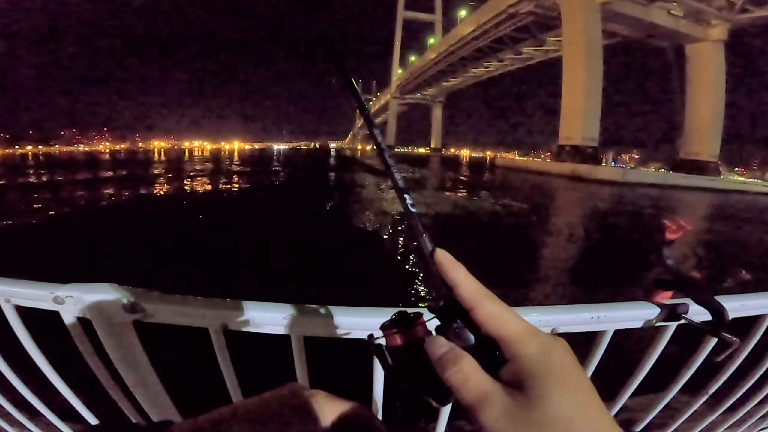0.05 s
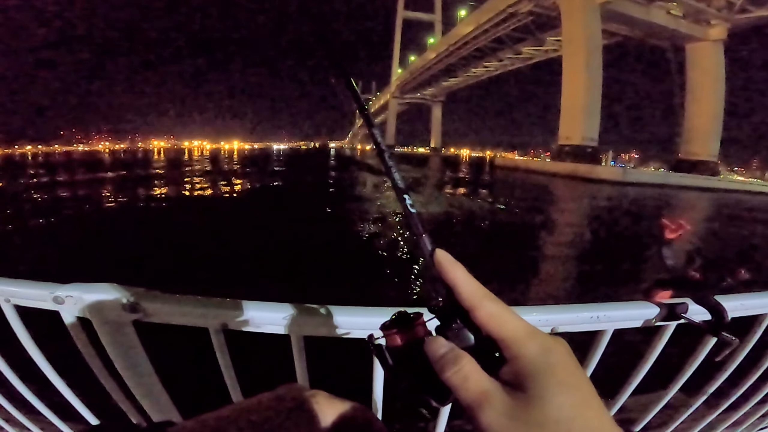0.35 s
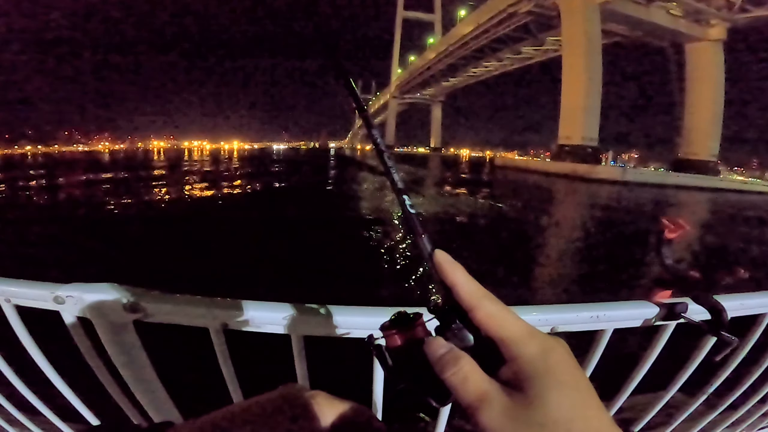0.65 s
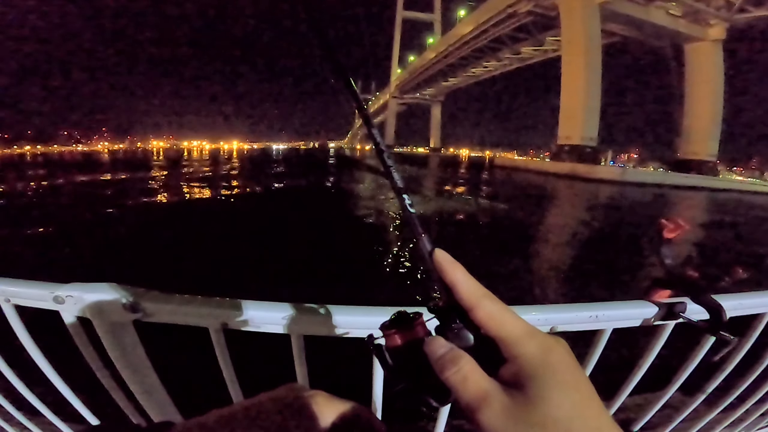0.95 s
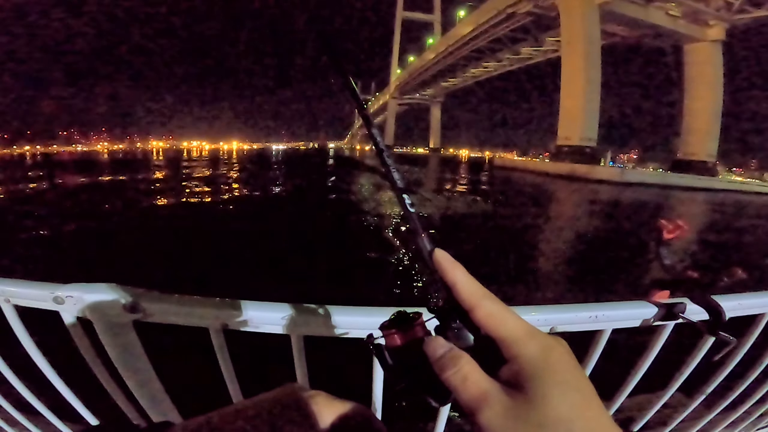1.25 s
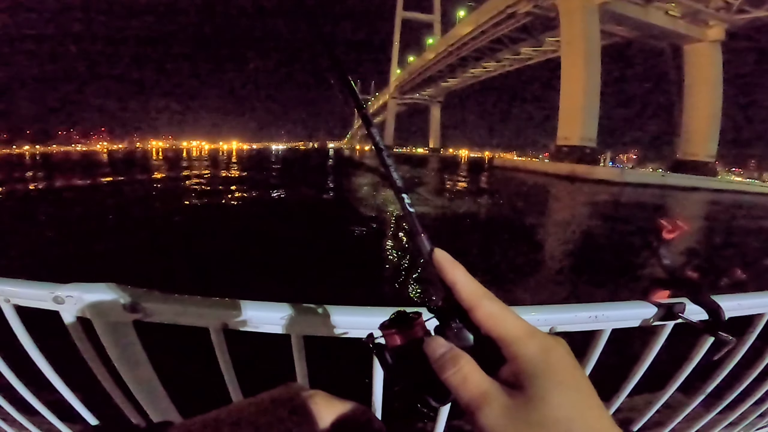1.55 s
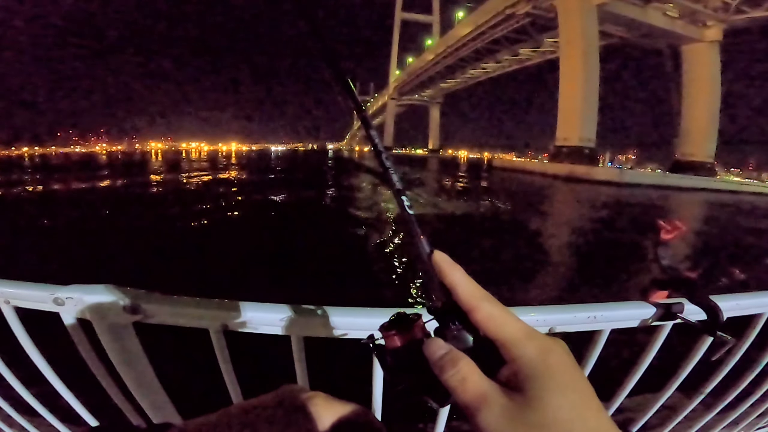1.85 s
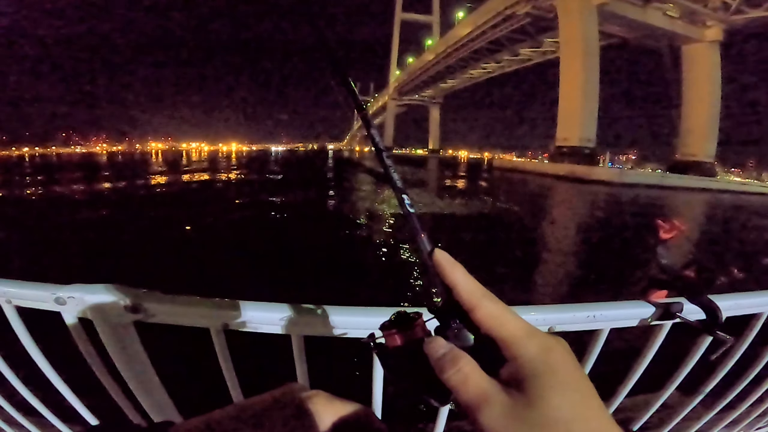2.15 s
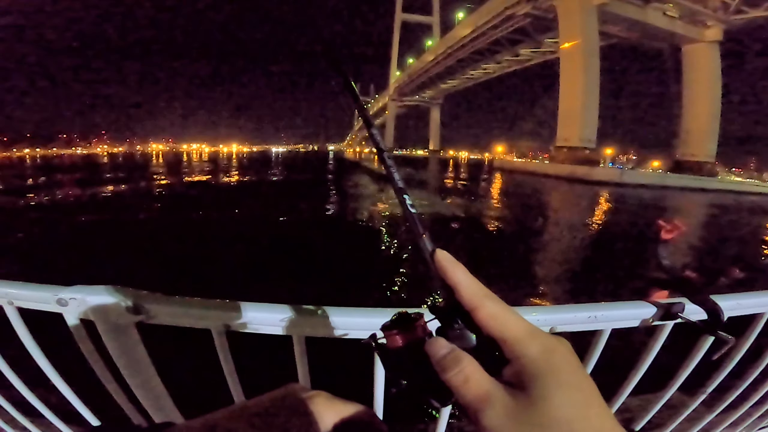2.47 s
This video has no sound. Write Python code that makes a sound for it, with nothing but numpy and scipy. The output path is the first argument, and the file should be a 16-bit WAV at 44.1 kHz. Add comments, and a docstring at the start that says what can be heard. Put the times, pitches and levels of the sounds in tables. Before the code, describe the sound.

Steady low traffic rumble from a bridge overhead, then a fishing reel's ratchet clicks and buzzes in quick tugs near the end.

```python
"""Under a big road bridge at night, fishing from a railing. Overhead the deck rumbles, tyres roar and
girders boom; near 3 s a lorry's axles slam over a joint. A diesel hums on the waterfront and a breeze
flutters on the microphone. From about 7 s line runs off the reel in tugs, close on the right:
ratchet teeth strike the pawl and ring it, its spring and the reel's frame."""
import sys
import numpy as np
from scipy import signal
from scipy.fft import rfft, irfft
from scipy.io import wavfile

SR = 44100
rng = np.random.default_rng(int(sys.argv[2]) if len(sys.argv) > 2 else 0)


def inscribe(sig):
    """Save sig as 16-bit PCM at rate SR to the path in sys.argv[1].

    A 1-D sig is mono; a 2-D sig holds one channel per row.
    Samples are clipped to [-1, 1] before scaling.
    """
    pcm = np.round(np.clip(np.atleast_2d(sig).T, -1, 1) * 32767)
    wavfile.write(sys.argv[1], SR, pcm.astype(np.int16))


N = 362943
T = np.arange(N) / SR
HZ = np.fft.rfftfreq(N, 1 / SR)
SPOOL_START_S, CREEP_TEETH_PER_S = 6.95, 52.11

# Noise spectra. Each row: frequency in Hz, relative density in dB.
DECK_SPECTRUM_DB = [(40, -17.5), (80, 7), (125, 0.5), (170, -2.5), (260, -3), (340, -7), (450, -4.5),
                    (520, -8), (620, -20.5), (1200, -80), (5000, -110)]
ROAR_SPECTRUM_DB = [(250, -7.5), (450, -10.5), (600, 1), (780, -0.5), (930, 2.5), (1200, -1), (1500, -5.5),
                    (2000, -11.5), (3000, -19.5), (6000, -72), (15000, -91.5)]
HISS_SPECTRUM_DB = [(900, -30), (1600, 1), (2300, 2), (3300, -4.5), (3900, -3), (5000, -12), (6500, -17),
                    (8300, -24), (10000, -30.5), (12500, -42), (15000, -55)]
GIRDER_SPECTRUM_DB = [(6, -22.5), (16, 2.5), (28, -2.5), (44, 3.5), (60, -7.5), (85, -9.5), (130, -28),
                      (400, -62.5), (2000, -110)]
FLUTTER_SPECTRUM_DB = [(6, -13.5), (20, 13.5), (45, 2), (75, 0.5), (120, -15), (200, -14), (400, -37.5),
                       (2000, -100)]
PUFF_SPECTRUM_DB = [(10, -16), (40, -6), (70, -7), (140, 0), (200, -19.5), (400, -27), (2000, -85)]
ROLL_SPECTRUM_DB = [(50, -20), (100, -9.5), (140, 4), (190, 1), (245, -1), (320, -1.5), (380, -2),
                    (600, -10.5), (1050, -13), (1600, -20.5), (3000, -60), (10000, -99.5)]
SLAM_SPECTRUM_DB = [(40, -29), (100, -0.5), (150, 6), (205, -4.5), (394, -5.5), (547, -15), (893, -14),
                    (1400, -21.5), (2860, -38.5), (6000, -91)]
TAP_SPECTRUM_DB = [(1000, -22), (4000, 5), (9500, -2), (12300, -6), (13500, -20), (16000, -32)]
RUB_SPECTRUM_DB = [(1000, -23.5), (3000, 5), (3900, 16.5), (5000, 5.5), (6600, 7), (9500, -4.5),
                   (12300, -8.5), (13500, -12.5), (16000, -28.5)]
LINE_SPECTRUM_DB = [(700, -8), (1400, -0.5), (2300, -1), (4000, -5.5), (7000, -16.5), (14000, -32.5)]
TICK_SPECTRUM_DB = [(600, 0), (1500, -5), (2500, 2), (4200, 5), (6300, 13.5), (7200, 5), (9500, 6),
                    (10600, 0), (11800, 3), (14000, 1), (15500, -4)]

# Level curves. Each row: time in seconds, level in dB.
HISS_LEVEL_DB = [(0, -53.5), (.55, -61.5), (1.0, -58.5), (1.8, -56), (2.05, -60), (2.5, -57.5), (4.15, -60),
                 (4.95, -56.5), (5.3, -59), (5.6, -55.5), (6.0, -58.5), (6.5, -56.5)]
GIRDER_LEVEL_DB = [(0, -37.5), (.7, -30.5), (1.1, -42.5), (1.5, -24), (1.8, -30.5), (2.2, -28),
                   (2.9, -33.5), (3.75, -29.5), (4.2, -34.5), (6.9, -36.5), (8.23, -40)]
DIESEL_LEVEL_DB = [(0, -23), (.65, -26.5), (1.25, -33), (1.62, -26.5), (1.83, -29), (2.0, -26.5),
                   (2.35, -24.5), (2.82, -24), (3.03, -31), (3.25, -23.5), (3.6, -28.5), (3.76, -24.5),
                   (4.55, -26), (4.7, -28.5), (5.75, -30), (5.92, -24.5), (6.65, -24.5), (7.15, -24.5),
                   (7.75, -28), (8.23, -27.5)]
WHINE_LEVEL_DB = [(0, -50.5), (3, -53.5), (4.5, -43.5), (6.5, -41), (8.23, -44)]
FLUTTER_LEVEL_DB = [(0, -37), (.7, -53.5), (3.1, -43), (4.2, -67), (5.05, -39), (5.9, -55), (6.75, -38),
                    (8.23, -40)]
LINE_LEVEL_DB = [(6.76, -100), (6.83, -47.5), (6.9, -44), (6.97, -35), (7.04, -48), (7.2, -52), (8.23, -44)]
SPRING_LEVEL_DB = [(6.955, -48), (7.02, -48), (7.075, -54), (7.103, -40), (7.125, -51), (7.483, -53),
                   (7.55, -55), (7.604, -44.5), (7.66, -57), (7.72, -51), (7.803, -52), (7.916, -42),
                   (7.96, -49), (8.0, -53), (8.094, -57), (8.171, -41), (8.196, -47), (8.221, -44)]
TICK_LEVEL_DB = [(6.95, -55), (7.02, -49), (7.08, -55), (7.25, -56), (7.37, -56), (7.53, -56.5),
                 (7.62, -48), (7.67, -52.5), (7.87, -51), (7.97, -51.5), (8.07, -55), (8.23, -49.5)]

# Single events. Each row: peak time in seconds, level in dB.
WIND_PUFFS = [(1.43, -35), (7.14, -34), (7.52, -25), (7.8, -40)]
AXLE_HITS = [(3.04, -29), (3.15, -32.5), (3.21, -24), (3.29, -28), (3.47, -37), (3.6, -31.5), (3.77, -32.5)]
TACKLE_TAPS = [(1.1124, -52), (1.3389, -60), (1.5294, -66), (1.6412, -58)]

# Engine and motor partials. Each row: multiple of the shaft rate, relative level in dB.
DIESEL_ORDERS = [(2, -0.5), (3, -20.5), (4, -22.5), (6, -29.5), (7, -27)]
WHINE_ORDERS = [(1, -2), (2, -16), (4, -19.5)]

# Reel resonances. Each row: frequency in Hz, bandwidth in Hz, relative gain in dB.
SPRING_MODES = [(8660, 73, 5), (7260, 50, -14), (7470, 54, -17), (7900, 72, -5), (9700, 53, -6)]
FRAME_MODES = [(2720, 180, 4.5), (3300, 70, -2), (3670, 76, 2.5), (4900, 410, 0), (7360, 60, 7),
               (9700, 100, 2.5)]

# Diffuse sound. Each row: frequency in Hz, left-right coherence as a ratio.
COHERENCE = [(30, 0.98), (130, 0.99), (290, 1), (640, 0.94), (1400, 0.81), (3100, 0.56), (7000, 0.78),
             (15000, 0.38)]
# Traffic flow. Each row: time in seconds, deck rumble in dB, tyre roar in dB.
TRAFFIC_LEVELS_DB = [(0, -35, -44.5), (.6, -38, -45), (1.4, -35.5, -43.5), (2.8, -36.5, -41.5),
                     (3.6, -34, -39.5), (4.5, -35, -40), (5.1, -33, -38.3), (5.28, -35, -39.5),
                     (5.65, -33.5, -38.5), (6.4, -35.5, -39), (7.5, -34.5, -39.5), (8.23, -32.5, -38)]
# Hand shifts on the rod. Each row: centre in seconds, half length in seconds, level in dB.
HAND_RUBS = [(.08, .14, -67.5), (.98, 0.046, -75), (1.14, .05, -69), (1.5, .17, -75), (1.76, .11, -68),
             (2.35, .06, -73), (4.4, 0.13, -71), (4.92, 0.31, -68), (5.57, .06, -69)]
# Spool speed, creeping between tugs. Each row: time in seconds, rate in teeth per second.
SPOOL_TEETH_PER_S = [(6.95, 66), (6.99, 180), (7.0, 179), (7.04, 105), (7.1, 148), (7.14, 62), (7.21, 110),
                     (7.24, 28), (7.29, 66), (7.33, 48), (7.41, 57), (7.55, 70), (7.6, 128), (7.63, 114),
                     (7.72, 170), (7.75, 124), (7.81, 87), (7.85, 95), (7.88, 146), (7.94, 143), (7.98, 80),
                     (8.11, 79), (8.15, 173), (8.23, 152)]
# Pawl squeak, shifting with load. Each row: time in seconds, level in dB, pitch in Hz.
PAWL_SQUEAK = [(6.955, -44, 6600), (6.985, -33, 5880), (7.0, -29, 5850), (7.02, -32.5, 5800),
               (7.04, -47, 6100), (7.062, -46, 5900), (7.09, -35.5, 5200), (7.119, -51.5, 5550),
               (7.193, -45, 5850), (7.303, -57, 5370), (7.42, -54, 5270), (7.485, -46, 5600),
               (7.528, -47, 6180), (7.556, -45, 6100), (7.596, -32, 5900), (7.655, -48, 6100),
               (7.668, -46.5, 5620), (7.684, -44, 5900), (7.697, -45, 5430), (7.734, -42, 6050),
               (7.748, -46, 5680), (7.764, -40, 6000), (7.792, -37, 5600), (7.815, -48, 5620),
               (7.857, -50, 6000), (7.876, -39.5, 4960), (7.943, -48, 5900), (7.991, -39.5, 5750),
               (8.055, -54, 6080), (8.127, -41, 5700), (8.153, -49, 5540), (8.177, -44, 6100),
               (8.192, -36, 5800), (8.221, -37, 5930)]
# Hard pawl catches. Each row: start in seconds, level in dB, pitch in Hz.
PAWL_CATCHES = [(7.2125, -14.5, 5540), (7.2245, -21, 5630), (7.2469, -28, 5400), (7.399, -25, 4950),
                (7.621, -20, 5710), (7.774, -24, 5700), (7.981, -21, 5530), (8.017, -20, 5850)]
# Spring releases. Each row: start in seconds, ring level in dB, tick level in dB, pitch in Hz.
SPRING_PINGS = [(7.2272, -35, -48, 8740), (7.2479, -37, -46, 8830), (7.2712, -29, -46, 8600),
                (7.2898, -34, -44, 8660), (7.3033, -33, -47, 8500), (7.3213, -28, -42, 8700),
                (7.4165, -31, -45, 8710), (7.8161, -32, -32, 8600), (8.0306, -35, -38, 8500)]
# Fits of frame ringing. Each row: centre in seconds, level in dB, pitch in Hz.
FRAME_RATTLES = [(6.965, -45, 2800), (6.985, -46, 3710), (7.113, -45, 2830), (7.198, -46, 3690),
                 (7.44, -44, 2740), (7.6, -46, 3800), (7.695, -42, 3730), (7.7, -41, 2820),
                 (7.9, -44, 2660), (7.925, -43, 2820), (7.975, -45, 2730), (7.985, -48, 3710),
                 (8.145, -39, 2750)]


def gain_of(db):
    """Decibels to amplitude."""
    return 10 ** (np.asarray(db) / 20)


def unit_rms(x):
    """Scale to rms 1."""
    return x / np.sqrt(np.mean(x ** 2) + 1e-20)


def unit_in_band(pair, band_hz):
    """Scale a pair so its mid signal has rms 1 within the band."""
    inside = (HZ > band_hz[0]) & (HZ < band_hz[1])
    return pair / np.std(irfft(rfft(pair.mean(0)) * inside, N))


def at_hz(table, hz):
    """Interpolate a table over log frequency."""
    row_hz, values = np.transpose(table)
    return np.interp(np.log(hz + 1), np.log(row_hz + 1), values)


def curves(table):
    """Each value column of a time table, per sample."""
    row_s, *columns = np.transpose(table)
    return [np.interp(T, row_s, column) for column in columns]


def wander(rate_hz):
    """Random drift of rms 1, rolled off above rate_hz."""
    return unit_rms(irfft(rfft(rng.standard_normal(N)) / (1 + (HZ / rate_hz) ** 4), N))


def swell(centre_s, half_s):
    """Gaussian bump of height 1."""
    return np.exp(-((T - centre_s) / half_s) ** 2)


def from_right(pair, lag_us, louder_db=0):
    """Source on the right: left channel lags, right is louder by louder_db."""
    left = irfft(rfft(pair[0]) * np.exp(-2j * np.pi * HZ * lag_us / 10 ** 6), N)
    return np.array([left * gain_of(-louder_db / 2), pair[1] * gain_of(louder_db / 2)])


def diffuse_noise(spectrum_db):
    """Coloured noise from the right, less coherent in the treble."""
    shared, separate = rfft(rng.standard_normal((2, N)))
    coherence = np.clip(at_hz(COHERENCE, HZ), -1, 1)
    right = coherence * shared + np.sqrt(1 - coherence ** 2) * separate
    pair = irfft(np.array([shared, right]) * gain_of(at_hz(spectrum_db, HZ)), N)
    return from_right(pair, lag_us=37.6)


def colour(pair, spectrum_db, size=2048):
    """Minimum-phase filter; clicks keep sharp fronts."""
    log_gain = np.log(gain_of(at_hz(spectrum_db, abs(np.fft.fftfreq(size, 1 / SR)))))
    taps = np.fft.ifft(np.exp(np.conj(signal.hilbert(log_gain)))).real
    return signal.oaconvolve(pair, taps[None], axes=1)[:, :N]


def resonate(x, hz, width_hz):
    """One resonance tracking the curve hz."""
    carrier = np.exp(2j * np.pi * np.cumsum(hz) / SR)
    pole = np.exp(-np.pi * width_hz / SR)
    return 2 * (carrier * signal.lfilter([1 - pole], [1, -pole], x / carrier + 1e-18)).real


def ring(x, modes, bend):
    """Damped modes, detuned together by the ratio bend."""
    return sum(gain_of(db) * resonate(x, hz * bend, width_hz) for hz, width_hz, db in modes)


def traffic():
    """Wheels shake the deck and tyres roar on the road; water laps below with a soft, wavering hiss."""
    deck_db, roar_db = curves(TRAFFIC_LEVELS_DB)
    hiss_db, = curves(HISS_LEVEL_DB)
    deck = unit_in_band(diffuse_noise(DECK_SPECTRUM_DB), (110, 550)) * gain_of(deck_db + 1.25 * wander(4))
    roar = unit_in_band(diffuse_noise(ROAR_SPECTRUM_DB), (600, 1800))
    roar *= gain_of(roar_db + .65 * wander(24))
    hiss = unit_in_band(diffuse_noise(HISS_SPECTRUM_DB), (3500, 9000))
    hiss *= gain_of(hiss_db + .99 * wander(14))
    return deck + roar + hiss


def girders():
    """Long steel spans boom in slow, lumpy swells."""
    boom = unit_in_band(diffuse_noise(GIRDER_SPECTRUM_DB), (18, 50))
    return boom * gain_of(curves(GIRDER_LEVEL_DB)[0] + .58 * wander(14))


def diesel(crank_hz=30.17, whine_hz=263, throb_db=.9):
    """Crank orders, led by the firing tone, plus a motor's wavering whine."""
    crank_turns = np.cumsum(crank_hz * (1 + .00365 * wander(3.1))) / SR
    hum = sum(gain_of(db) * np.sin(2 * np.pi * (order * crank_turns + rng.random()))
              for order, db in DIESEL_ORDERS)
    motor_turns = np.cumsum(whine_hz * (1 + .008 * wander(5.06))) / SR
    whine = sum(gain_of(db + 3.4 * wander(1.5)) * np.sin(2 * np.pi * order * motor_turns)
                for order, db in WHINE_ORDERS)
    hum *= gain_of(curves(DIESEL_LEVEL_DB)[0] + throb_db * wander(6.2))
    whine *= gain_of(curves(WHINE_LEVEL_DB)[0])
    mono = np.sqrt(2) * (hum + whine)
    return from_right([mono, mono], lag_us=13)


def breeze():
    """Eddies buffet each channel separately; sudden puffs reach higher in pitch."""
    flutter, puff = (unit_in_band(colour(rng.standard_normal((2, N)), spectrum, size=8192), (25, 250))
                     for spectrum in (FLUTTER_SPECTRUM_DB, PUFF_SPECTRUM_DB))
    gusts = sum(gain_of(db) * swell(s, half_s=.021) for s, db in WIND_PUFFS)
    return flutter * gain_of(curves(FLUTTER_LEVEL_DB)[0] + 5 * wander(13)) + puff * gusts


def lorry(roll_db=-35.5, rise_db_per_s=154, fade_db_per_s=92):
    """Deck rumble swells under the lorry; each axle slams into a joint."""
    roll, slam = (unit_in_band(diffuse_noise(spectrum), (110, 550))
                  for spectrum in (ROLL_SPECTRUM_DB, SLAM_SPECTRUM_DB))
    roll_power = gain_of(roll_db) ** 2 * swell(centre_s=3.35, half_s=.5)
    slam_power = sum(gain_of(db - np.maximum((s - T) * rise_db_per_s, (T - s) * fade_db_per_s)) ** 2
                     for s, db in AXLE_HITS)
    return roll * np.sqrt(roll_power) + slam * np.sqrt(slam_power)


def tackle(tap_decay_s=.006, grip_db=-78.5, uneven_db=3.5):
    """Rod and reel tick faintly and rustle under the hand."""
    impulses = np.zeros(N)
    for s, db in TACKLE_TAPS:
        impulses[round(s * SR)] += gain_of(db)
    tap_gain = signal.lfilter([1], [1, -np.exp(-1 / (tap_decay_s * SR))], impulses)
    rub_gain = gain_of(grip_db) + sum(gain_of(db) * swell(s, half_s) for s, half_s, db in HAND_RUBS)
    rub_gain *= gain_of(uneven_db * wander(60))
    taps = colour(tap_gain * rng.standard_normal((2, N)), TAP_SPECTRUM_DB)
    rubs = colour(rub_gain * rng.standard_normal((2, N)), RUB_SPECTRUM_DB)
    return taps + rubs


def line():
    """Tightening line swishes through the rod rings."""
    return unit_rms(diffuse_noise(LINE_SPECTRUM_DB)) * gain_of(curves(LINE_LEVEL_DB)[0])


def spring_pings(ring_rise_s=.0015, flick_rise_s=.00055):
    """The spring flicks free: a bright tick, then a short, high ring."""
    rings, flicks = np.zeros((2, N))
    for s, ring_db, flick_db, hz in SPRING_PINGS:
        age_s = np.maximum(T - s, 0)
        ring_age, flick_age = age_s / ring_rise_s, age_s / flick_rise_s
        rings += gain_of(ring_db) * ring_age * np.exp(1 - ring_age) * np.sin(2 * np.pi * hz * age_s)
        flicks += gain_of(flick_db) * flick_age * np.exp(1 - flick_age)
    ticks = colour(flicks * rng.standard_normal((2, N)), TICK_SPECTRUM_DB)
    return from_right(rings + ticks, lag_us=31, louder_db=8)


def pawl_catches(decay_s=.00099):
    """The pawl catches hard and lets go with a sharp snap."""
    snaps = np.zeros(N)
    for s, db, hz in PAWL_CATCHES:
        age_s = np.maximum(T - s, 0)
        snaps += gain_of(db) * np.exp(-age_s / decay_s) * np.sin(2 * np.pi * hz * age_s)
    return from_right([snaps, snaps], lag_us=41, louder_db=6)


def frame_rattles(knock):
    """In short fits, tooth knocks build up one frame mode, which rings on."""
    out = np.zeros((2, N))
    for s, db, hz in FRAME_RATTLES:
        near = abs(T - s) < .1
        burst = swell(s, half_s=.017)[near]
        rung = resonate(knock[:, near] * burst, np.full(len(burst), hz), width_hz=65)
        out[:, near] += gain_of(db) * unit_rms(rung) * np.sqrt(np.mean(burst ** 2))
    return from_right(out, lag_us=57)


def tooth_blows(teeth_per_s):
    """One impulse per tooth passing the pawl, at constant mean power."""
    passed = np.cumsum(teeth_per_s * (T >= SPOOL_START_S)) / SR
    return np.diff(np.floor(passed + .5), prepend=0) / np.sqrt(teeth_per_s)


def chatter(blows, scrape_ms, snap, spread, echo_db, slide_db, uneven_db=2, echo_decay_s=.007):
    """Each tooth scrapes and snaps free, the pawl slides on; rod and railing scatter the sound."""
    blows = blows * gain_of(uneven_db * np.clip(rng.standard_normal(N), -2, 2))
    age_s = np.arange(2048) / SR
    scrape_age = age_s * 1000 / scrape_ms
    stroke = scrape_age * np.exp(-scrape_age)
    contact = signal.oaconvolve(blows, stroke / np.linalg.norm(stroke))[:N]
    sliding = gain_of(slide_db) * (T >= SPOOL_START_S) / np.sqrt(SR)
    grit = rng.standard_normal(N) + spread * rng.standard_normal((2, N))
    direct = np.hypot(contact, sliding) * grit + snap * np.roll(blows, np.argmax(stroke))
    scatter = rng.standard_normal((2, len(age_s))) * np.exp(-age_s / echo_decay_s) * (age_s > .002)
    scatter /= np.linalg.norm(scatter, axis=1, keepdims=True)
    return direct + gain_of(echo_db) * signal.oaconvolve(direct, scatter, axes=1)[:, :N]


def reel(lead_s=.0006, creep_db=-55, db_per_doubling=4):
    """Ratchet teeth tick and ring pawl, spring and frame; the frame rings louder with spool speed."""
    teeth_per_s, = curves(SPOOL_TEETH_PER_S)
    pawl_db, pawl_hz = curves(PAWL_SQUEAK)
    frame_db = creep_db + db_per_doubling * np.log2(teeth_per_s / CREEP_TEETH_PER_S)
    # No two teeth strike alike: each ring is detuned.
    pawl_bend, spring_bend, frame_bend = (1 + share * wander(55) for share in (.02, .008, .009))
    blows = tooth_blows(teeth_per_s)
    early = np.roll(blows, -round(lead_s * SR))  # the pawl squeaks before it snaps free

    hit = chatter(early, scrape_ms=.35, snap=5, spread=1.5, echo_db=-20, slide_db=-27, uneven_db=.5)
    buzz = chatter(blows, scrape_ms=.8, snap=.6, spread=.57, echo_db=-14, slide_db=-22)
    knock = chatter(early, scrape_ms=.7, snap=.5, spread=.44, echo_db=-8, slide_db=-22)
    rasp = chatter(blows, scrape_ms=.8, snap=.2, spread=.72, echo_db=-11, slide_db=-11)

    squeak = resonate(hit, pawl_hz * pawl_bend, width_hz=370)
    pawl = from_right(resonate(squeak, pawl_hz * pawl_bend, width_hz=650), lag_us=60, louder_db=3.5)
    spring = from_right(ring(buzz, SPRING_MODES, spring_bend), lag_us=32, louder_db=7)
    frame = from_right(ring(knock, FRAME_MODES, frame_bend), lag_us=60)
    tick = from_right(colour(rasp, TICK_SPECTRUM_DB), lag_us=48, louder_db=7)
    ratchet = (unit_in_band(pawl, (4600, 6800)) * gain_of(pawl_db)
               + unit_in_band(spring, (8300, 9100)) * gain_of(curves(SPRING_LEVEL_DB)[0])
               + unit_in_band(frame, (2550, 2950)) * gain_of(frame_db)
               + unit_in_band(tick, (10500, 15500)) * gain_of(curves(TICK_LEVEL_DB)[0]))
    running_share = 1 - SPOOL_START_S / T[-1]  # levels apply while the spool turns
    return ratchet * np.sqrt(running_share) + frame_rattles(knock)


def scene():
    """Bridge, waterfront and fishing tackle, in stereo."""
    background = traffic() + lorry() + girders() + breeze() + diesel()
    return background + reel() + pawl_catches() + spring_pings() + line() + tackle()


def record(dry):
    """Steep low-pass."""
    edge_hz = 15850
    taps = signal.firwin(1023, edge_hz, window=("kaiser", 9), fs=SR)
    return signal.oaconvolve(dry, taps[None], "same")


dry = scene()
out = record(dry)
inscribe(out)
```